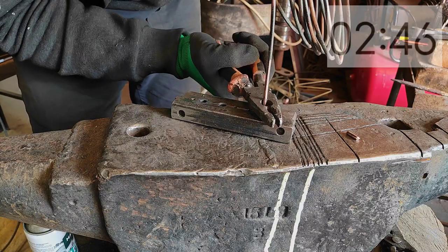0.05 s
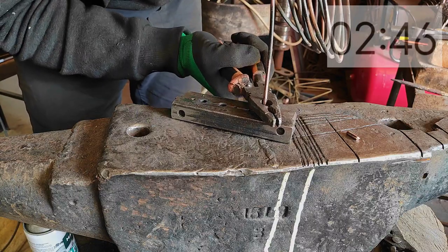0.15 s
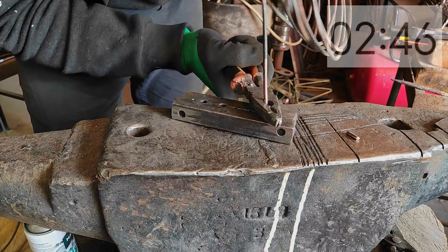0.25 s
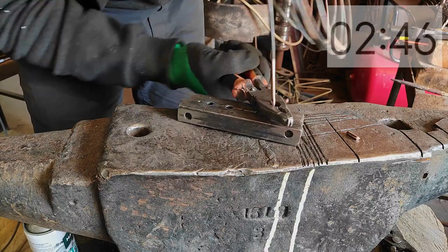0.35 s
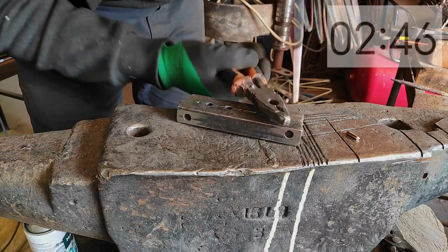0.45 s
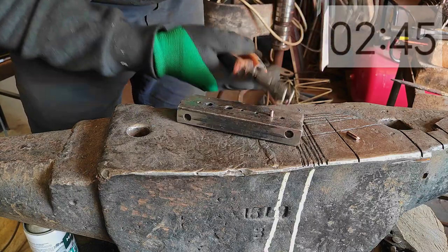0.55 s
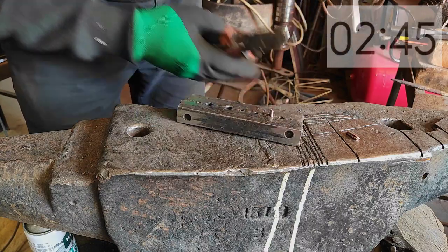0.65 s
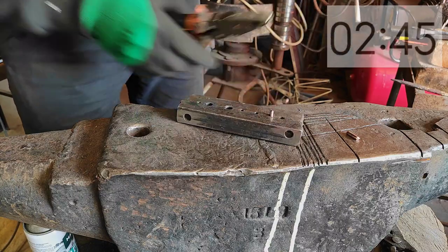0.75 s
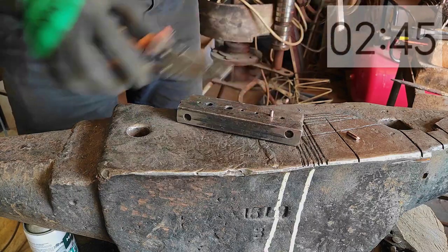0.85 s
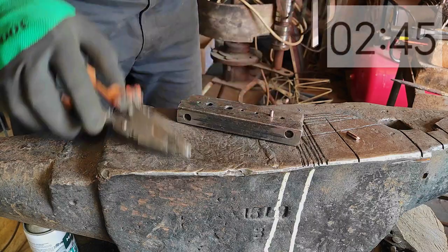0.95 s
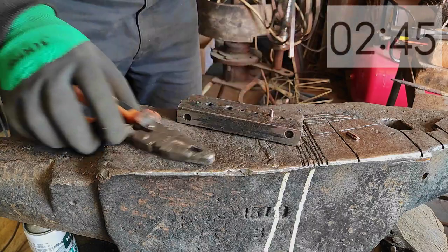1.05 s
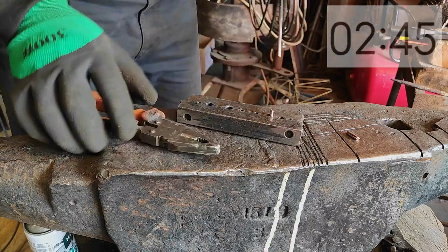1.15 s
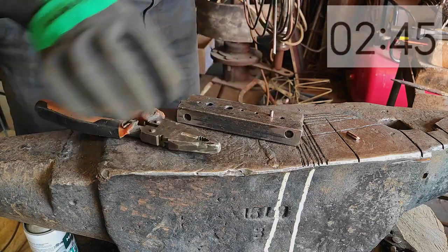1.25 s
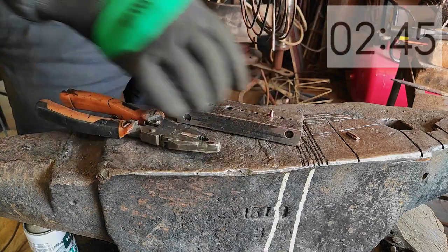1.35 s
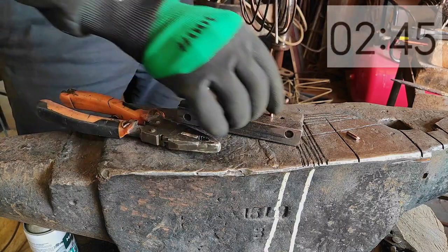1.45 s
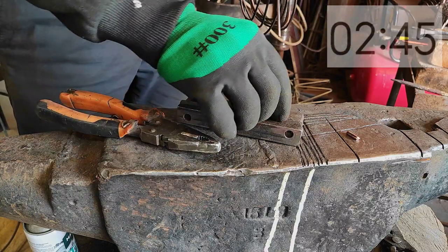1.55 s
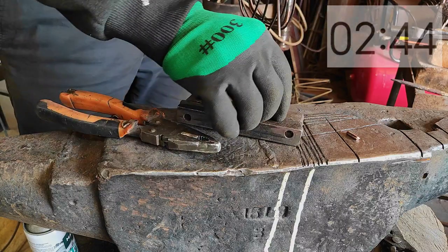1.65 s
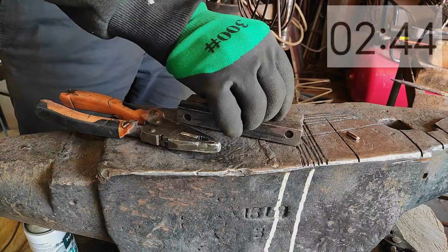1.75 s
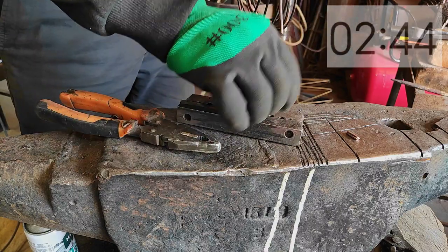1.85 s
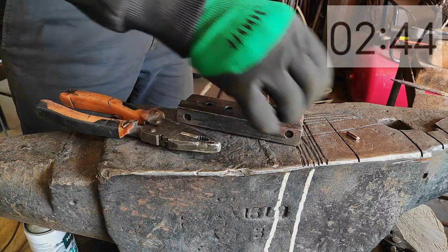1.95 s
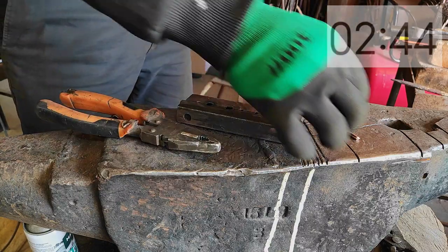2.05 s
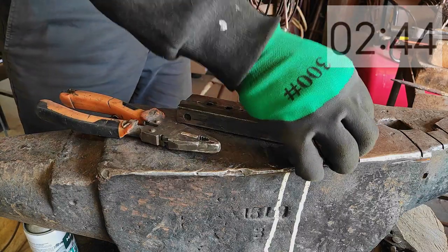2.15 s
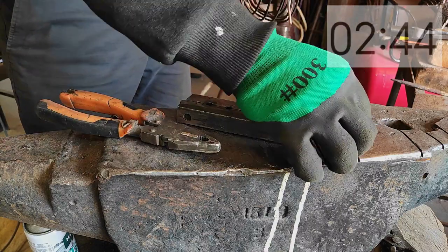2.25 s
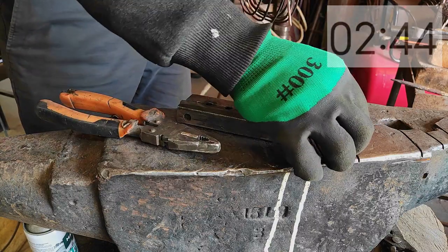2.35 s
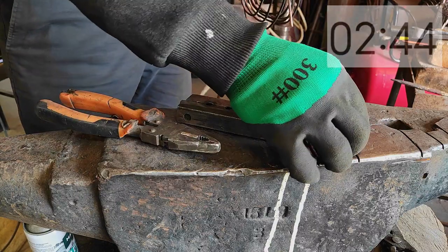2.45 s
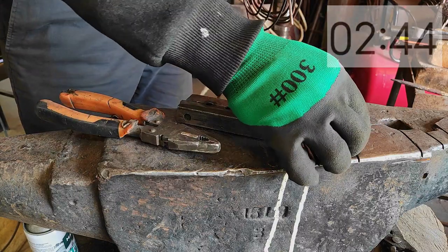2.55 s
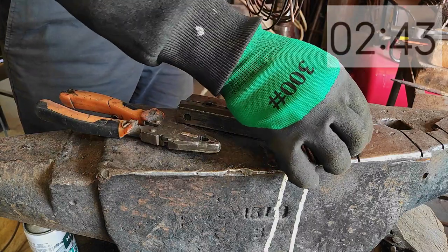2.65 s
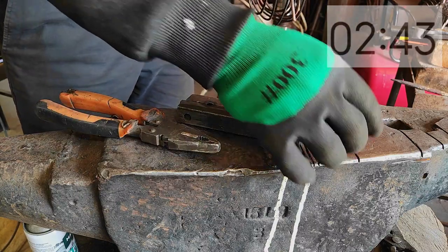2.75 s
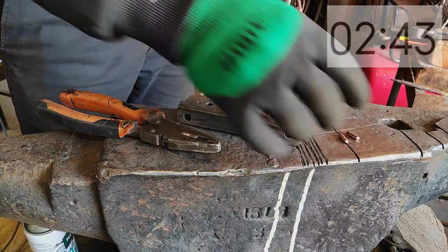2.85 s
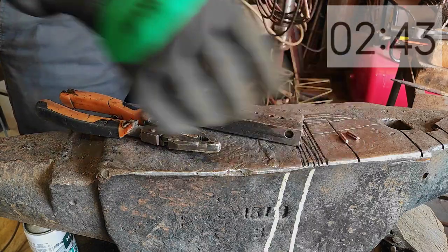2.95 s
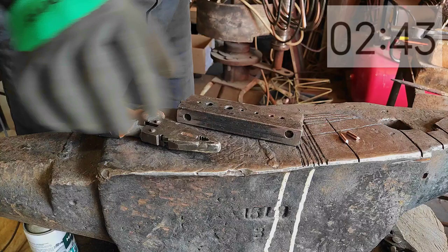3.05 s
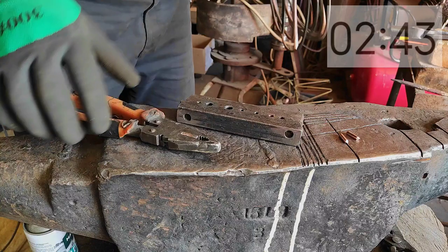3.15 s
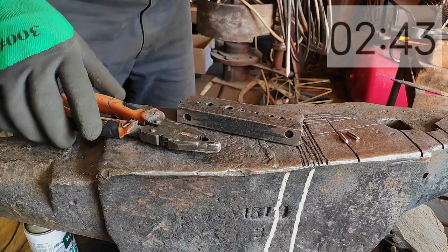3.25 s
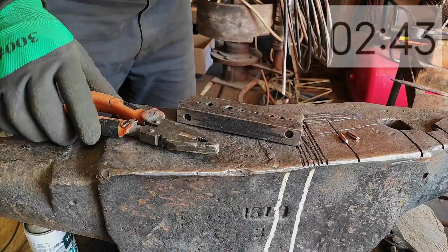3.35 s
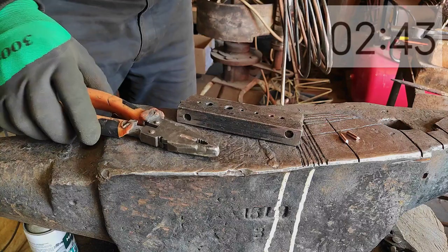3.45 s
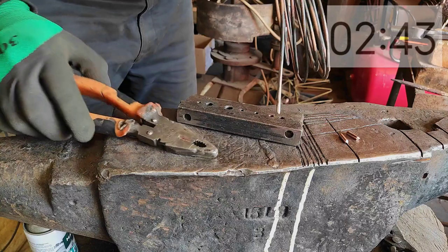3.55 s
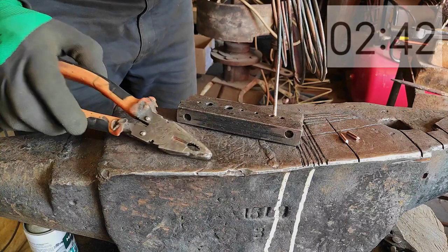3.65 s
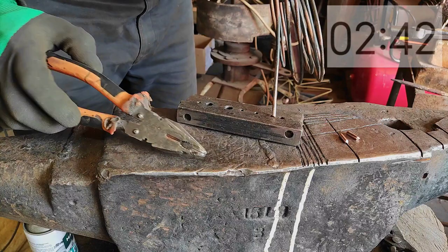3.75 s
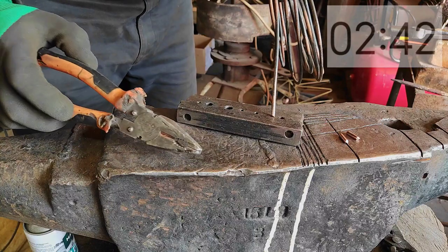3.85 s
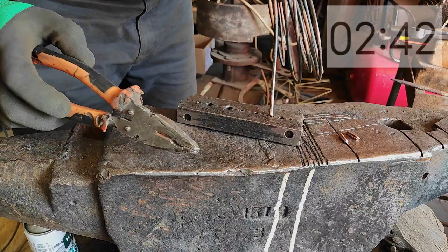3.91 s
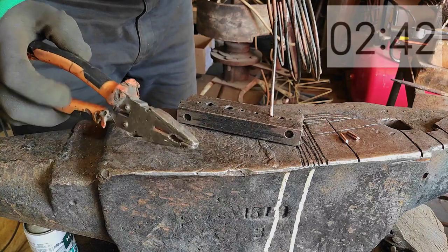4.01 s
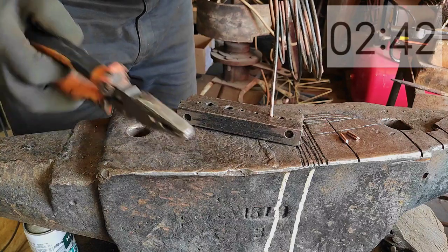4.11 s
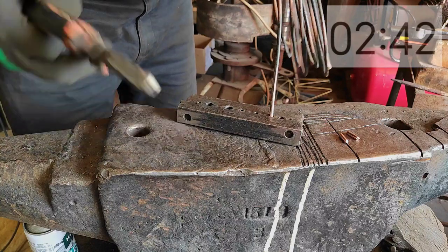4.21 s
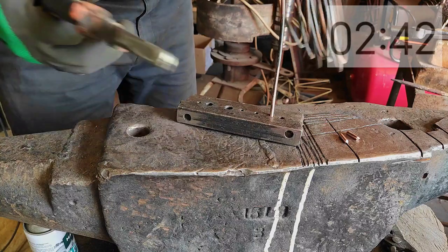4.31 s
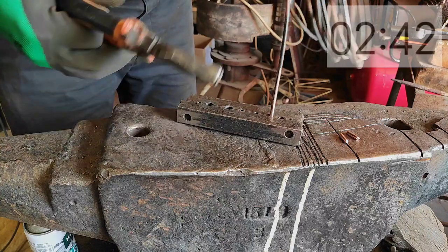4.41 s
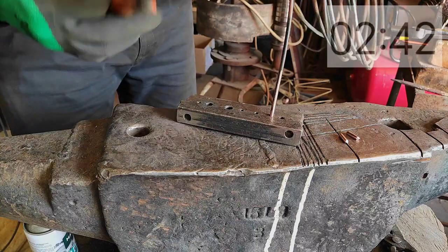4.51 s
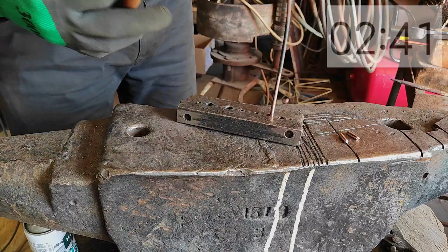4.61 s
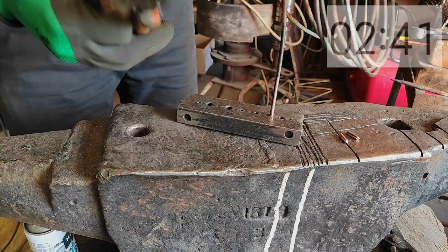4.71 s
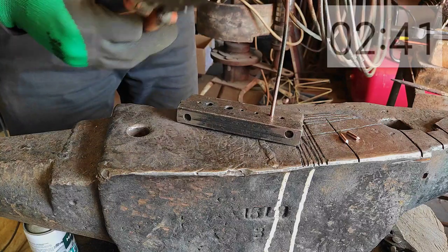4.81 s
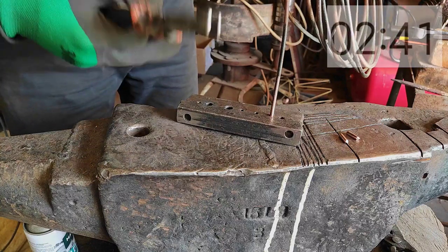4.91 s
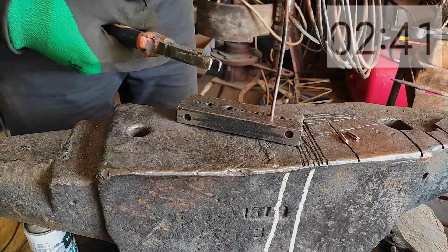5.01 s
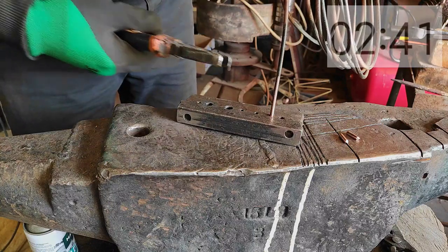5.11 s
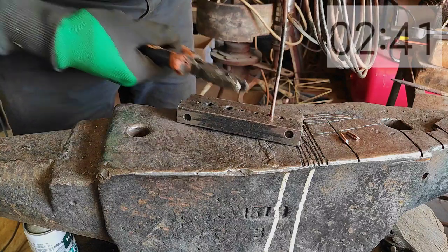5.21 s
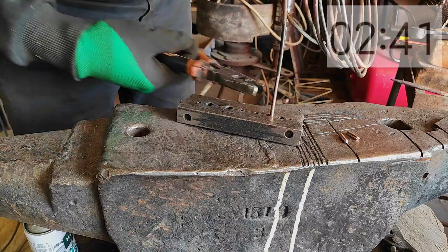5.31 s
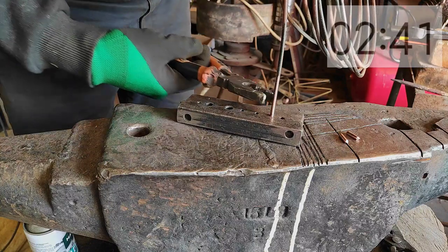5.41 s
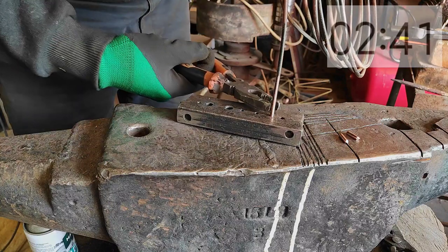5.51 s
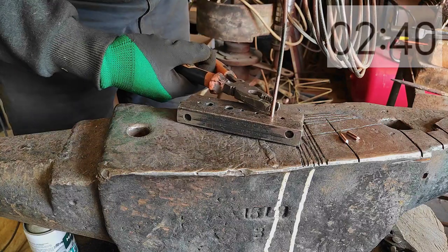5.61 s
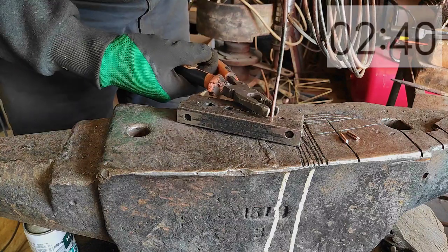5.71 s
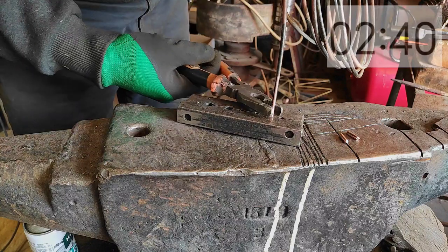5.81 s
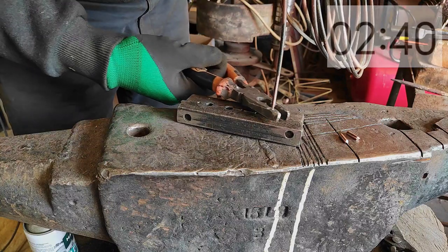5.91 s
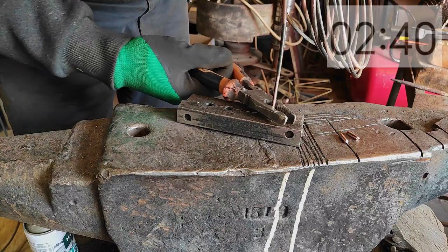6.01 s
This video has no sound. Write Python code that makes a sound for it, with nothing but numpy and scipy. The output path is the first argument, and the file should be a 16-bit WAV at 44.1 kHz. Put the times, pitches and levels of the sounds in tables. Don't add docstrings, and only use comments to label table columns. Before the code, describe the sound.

Close stereo view of a bench in a small, hard-walled workshop. Nippers cut a copper rod with a loud sharp crack and brief rattle; tiny offcuts tick. The tool clanks down on an anvil with a ring, gloves rustle quietly, then it is picked up with a bright clack. Its joint clicks, and it returns with a hard tap and small knocks. A faint distant engine hums beneath soft hiss.

```python
import sys
import numpy as np
from scipy import signal
from scipy.fft import rfft, irfft
from scipy.io import wavfile
from scipy.ndimage import uniform_filter1d

SR = 44100
rng = np.random.default_rng(int(sys.argv[2]) if len(sys.argv) > 2 else 0)


def voltage_ratio(level):
    return 10 ** (np.asarray(level, float) / 20)


def waveform_to_disk(signal):
    frames = np.transpose(np.atleast_2d(signal))
    scaled = np.clip(frames, -1, 1) * 32767
    samples = np.round(scaled).astype(np.int16)
    wavfile.write(sys.argv[1], SR, samples)


N = 267610

# pitch_hz, level_db
AIR_COLOUR = [(90, -25), (150, -14), (183, -0.5), (250, -9.5), (310, -7.5), (1000, -15), (1700, -16.5),
              (3500, -21.5), (6500, -25), (8600, -30), (10300, -29), (15200, -26), (15900, -44),
              (17000, -63.5)]
# time_s, speed_turns_per_s
ENGINE_SPEED = [(0.18, 19.3), (0.69, 20.9), (0.98, 23.3), (1.28, 24.3), (1.74, 23.3), (2.04, 20.6),
                (2.33, 23.3), (2.7, 22.1), (2.96, 22.2), (3.57, 24.4), (3.92, 22.4), (4.22, 23.4),
                (4.34, 21.7), (4.73, 24.4), (5.53, 21.2), (5.8, 24.0), (6.07, 22.5)]
# multiple_of_turn_rate, level_db
ENGINE_ORDERS = [(2, -69), (4, -65), (5, -63), (6, -69)]
# pitch_hz, width_hz, level_db
HUM_BODY = [(73.2, 12, -2), (101.6, 37, -2), (177.6, 32, -7)]
# start_s, end_s, pitch_hz, level_db
DRONE = [
    (0.058, 0.273, 371, -65.5),
    (0.725, 1.06, 371, -64),
]
# pitch_hz, t60_s, level_db
ROOM_DECAY = [(162.4, 0.91, -5.5), (293.5, 0.71, -6), (502, 0.61, -7.5), (905, 0.56, -7.5),
              (2020, 0.51, -8), (3744, 0.35, -10), (7900, 0.31, -9), (13400, 0.29, -13)]

# start_s, length_s, level_db, dull_rub_weight_db
GLOVE_STROKES = [(0.0, 0.053, -79.5, 14.5), (0.757, 0.0425, -69, 1.5), (0.835, 0.05, -64.5, -5),
                 (0.905, 0.094, -64.5, -2), (1.268, 0.034, -59.5, -18), (1.677, 0.056, -69.5, 2),
                 (1.807, 0.019, -68.5, -4), (1.893, 0.034, -66.5, -1.5), (2.103, 0.027, -66, -19),
                 (2.14, 0.032, -59.5, -4), (2.235, 0.035, -71.5, -8), (2.784, 0.039, -65, -3),
                 (3.29, 0.2, -71.5, -5), (3.391, 0.023, -80, -15), (4.554, .04, -69.5, -13),
                 (3.533, 0.052, -66.5, -10), (4.152, 0.054, -64, -19), (4.292, 0.16, -58.5, -26.5),
                 (4.635, 0.044, -60, -12), (4.724, 0.064, -54.5, -19), (4.853, 0.016, -65, -25),
                 (4.955, 0.086, -64.5, -23), (5.208, 0.24, -74.5, 5), (5.87, 0.0267, -86, -3.5),
                 (5.985, 0.053, -74, 12)]
# start_s, length_s, pitch_hz, level_db
SQUEAK_STROKES = [(0.062, 0.096, 1170, -72), (0.47, .025, 6500, -53), (.555, .02, 2790, -56.5),
                  (1.807, .02, 2900, -69), (1.923, .03, 750, -64.5), (3.277, .04, 3600, -73.5),
                  (3.308, .015, 2960, -73), (3.375, 0.014, 6500, -76), (3.705, .015, 2700, -59),
                  (4.887, .008, 1500, -61), (5.21, .04, 2900, -73.5), (5.297, 0.11, 3530, -74),
                  (5.323, 0.055, 1780, -70.5), (5.377, 0.043, 2150, -74), (5.968, 0.034, 6140, -68)]

# pitch_hz, width_octaves, level_db
SHIVER_MODES = [(1580, 0.32, -1.5), (2700, 0.36, -7.5), (3900, 0.19, -2.5), (5400, .12, -3.5),
                (6500, .5, -2.5)]
# start_s, level_db
SHIVER_STARTS = [
    (.311, -34.5),
    (0.393, -44),
    (1.112, -46),
]

# start_s, peak_db
BLOCK_THUMPS = [(0.308, -22.5), (0.392, -32), (1.95, -51.5), (5.506, -47), (5.836, -45.5), (6.007, -43.5),
                (6.048, -45)]
# start_s, peak_db
ANVIL_THUMPS = [(1.106, -28), (1.14, -34.5), (1.199, -28.5), (3.612, -39.5), (4.631, -50), (4.727, -45.5),
                (5.621, -34)]
# start_s, peak_db, pitch_hz
STAND_THUMPS = [(0.305, -33.5, 158), (0.4, -35, 107), (1.111, -36.5, 171), (1.205, -33.5, 161),
                (1.268, -48, 174), (3.614, -53, 107), (5.624, -48, 114)]

# start_s, peak_db, left_minus_right_db, bass_db, treble_db
JOINT_CLICKS = [(1.952, -49, -4, -8, -16), (1.9649, -47.5, -3, -12.5, -22), (3.2687, -59.5, -2, -13, -24),
                (3.5311, -57, -2.5, -22.5, -23), (3.5475, -52, -4, -22, -19), (3.5785, -50, -5, -11, -24),
                (4.2825, -44.5, -3, -11, -12), (4.6324, -46.5, -4, -15, -27), (4.7098, -41, -1, -11, -36),
                (4.7300, -30.5, -5, -19, -24), (4.8846, -52, -2, -13, -7), (4.8994, -54, -6, -24, -15)]
# pitch_hz, level_db
JOINT_COLOUR = [(290, -19.5), (500, -14), (2730, -6.5), (3700, -3), (5310, -15.5), (6060, -4), (7100, -21),
                (14900, -21), (16000, -40)]
# pitch_hz, level_db, t60_s, left_minus_right_db, left_lead_rad, rise_s
PIVOT_MODES = [(5800, 3, 0.045, 20, 0.62, 0.00088), (6230, 1.1, 0.085, -5, 0.67, 0.00075)]
# start_s, level_db
PIVOT_STARTS = [(1.955, -60), (1.965, -55.5), (4.283, -60), (4.712, -71), (4.731, -47), (6.013, -61),
                (6.052, -52)]
# pitch_hz, level_db, t60_s, left_minus_right_db, left_lead_rad, rise_s
SPRING_MODES = [(4730, -1, .03, 6, .6, 0.0011), (5900, 6, 0.025, 18, 0.66, 0.00081),
                (7640, 3, 0.029, -11, .5, 0.00082), (12730, -8, 0.043, -13, .5, .001)]
# start_s, level_db
SPRING_STARTS = [(4.515, -67), (4.879, -62), (4.8865, -52), (4.9, -56), (4.915, -63), (4.931, -59),
                 (4.938, -64), (4.947, -62)]

# start_s, peak_db, left_minus_right_db, bass_db, treble_db
OFFCUT_TICKS = [(0.4733, -38, 1.3, -36, -16), (0.5144, -22.5, 1.0, -16.5, -21.5),
                (0.5337, -29, 0.81, -15, -16), (0.7206, -44.5, -1.2, -3.5, -18),
                (2.576, -54, 0.5, -21.5, -15), (5.5056, -27.5, -1.6, -16.5, -18),
                (5.5105, -30, -0.13, -17.5, -16.5)]
# pitch_hz, level_db
OFFCUT_COLOUR = [(350, -23.5), (600, -7), (1040, -11.5), (1230, -7), (3210, -3.5), (5630, 3), (7830, -2.5),
                 (13400, -4.5), (16000, -10.5)]

# start_s, peak_db, left_minus_right_db, bass_db, treble_db
BLOCK_KNOCKS = [(0.876, -45.5, -0.5, -2, -28), (1.233, -44.5, 0.91, -4, -32), (3.563, -51, -1.5, -10, -30),
                (3.584, -53, 0, -5, -30), (4.886, -56, 0.48, -14, -32), (5.8294, -26, -1.5, -7, -19),
                (5.845, -35, -0.5, -20, -25), (6.013, -38, -1.6, 0, -28), (6.0395, -40.5, -1.4, 3, -27),
                (6.051, -36, -0.5, 1, -12)]
# pitch_hz, level_db
BLOCK_COLOUR = [(290, -38.5), (500, -14.5), (946, -5), (2190, -10.5), (3590, -6), (6230, -13),
                (7860, -12.5), (8580, -23.5), (9770, -17.5), (14700, -20.5), (16000, -30)]
# pitch_hz, level_db, t60_s, left_minus_right_db, left_lead_rad, rise_s
BLOCK_MODES = [(959, 0.96, 0.035, 0, .2, .001), (1436, 0, 0.025, 0, .5, .001)]
# start_s, level_db
BLOCK_STARTS = [(.876, -48), (5.785, -53), (5.799, -56), (5.83, -38.5), (5.846, -41), (6.013, -40.5),
                (6.039, -52), (6.052, -39)]

# start_s, peak_db, left_minus_right_db, bass_db, treble_db
JAW_BLOWS = [(5.6192, -16, 0, -31, -32), (5.6324, -34, 0.18, -27, -45), (5.6262, -32, 1, -38, -38),
             (5.771, -35.5, 0.9, -33, -48)]
# pitch_hz, level_db
JAW_COLOUR = [(290, -21), (500, -31), (974, -10), (1740, -17.5), (2130, -7), (2330, -11), (2690, -5.5),
              (6420, -3.5), (8700, -10), (14700, -14.5), (16000, -32)]
# pitch_hz, level_db, t60_s, left_minus_right_db, left_lead_rad, rise_s
JAW_TIP_MODES = [(4720, -6, .1, 0, .8, .001), (3600, 5, .03, 0, .5, .001), (2750, 2, .03, 0, .5, .001)]
# start_s, level_db
JAW_TIP_STARTS = [(5.62, -52), (5.771, -55), (5.785, -57), (5.846, -56)]
# pitch_hz, level_db, t60_s, left_minus_right_db, left_lead_rad, rise_s
JAW_RING_MODES = [(2190, -1.5, .7, -4, .9, .04), (1981, -6, .25, -8, -1, .005),
                  (2794, -3, .15, 0, .5, .002), (6212, 8, .09, 0, .5, .001), (7634, -1, .14, 2, .6, .002),
                  (5249, -6, .4, 0, .5, .002), (3580, -1, .2, 0, .5, .002), (4592, -5, .25, 2, .4, .002),
                  (7499, 0, .17, 0, .6, .002)]
# start_s, level_db
JAW_RING_STARTS = [
    (5.62, -52),
]

# start_s, peak_db, left_minus_right_db, bass_db, treble_db
LIFT_BLOWS = [
    (3.6101, -19.5, 0.12, -50, -25),
    (3.6254, -46, 1.5, -39.5, -19),
]
# pitch_hz, level_db
LIFT_COLOUR = [(290, -45), (500, -20), (718, -22), (880, -14), (1900, -17.5), (3650, -4.5), (4030, -9),
               (5880, -0.5), (8090, -21), (9360, -11), (15100, -29.5), (16000, -54.5)]
# pitch_hz, level_db, t60_s, left_minus_right_db, left_lead_rad, rise_s
HANDLE_MODES = [(3661, -1, .17, -3, .5, .002), (3585, -1, .17, 0, .5, .002), (4500, -21, 1.1, 2, .2, .002),
                (5658, -15, .55, -6, -1.5, .002), (5534, -11, .35, 2, .5, .002),
                (6476, -6, .15, 0, .7, .002), (4700, -13, .25, -2, .5, .002), (6185, -10, .24, 0, .5, .002),
                (8446, -16, .19, 3, .3, .002)]
# start_s, level_db
HANDLE_STARTS = [
    (3.6128, -40.5),
]
# pitch_hz, level_db, t60_s, left_minus_right_db, left_lead_rad, rise_s
LIFT_CLANK_MODES = [(3590, -4, 0.015, -1, 0.75, 0.00035), (5880, 4, 0.014, 0, 0.9, 0.001),
                    (5560, -1, .012, 1, .9, .001)]
# start_s, level_db
LIFT_CLANK_STARTS = [(3.6103, -16), (3.6168, -36), (3.6188, -35), (3.6275, -38), (3.64, -39)]

# start_s, peak_db, left_minus_right_db, bass_db, treble_db
LAID_BLOWS = [(1.1052, -10, -1.5, -17, -24), (1.1177, -25.5, 2.5, -21, -25.5),
              (1.1400, -21, 0.5, -15, -29.5), (1.128, -33, 0.5, -23, -28), (1.153, -33, 3, -27, -26),
              (1.166, -34, -1.5, -22, -28.5), (1.1862, -30.5, 3, -20, -32.5), (1.188, -37, 0.5, -16, -27.5),
              (1.2252, -38.5, 6.5, -7, -30)]
# pitch_hz, level_db
LAID_COLOUR = [(290, -48.5), (500, -24), (1060, -14.5), (1210, -13.5), (1840, -28), (2430, -12.5),
               (3390, -11.5), (4340, -7), (4800, -5), (5240, -1), (8960, -22.5), (10800, -17.5),
               (16000, -32.5)]
# pitch_hz, level_db, t60_s, left_minus_right_db, left_lead_rad, rise_s
ANVIL_MODES = [(4502, 2, .7, 2, .1, .002), (5055, -9.5, 1.3, -1, .7, .14), (5658, -14, .45, -5, -2.7, .002),
               (8446, -13, .26, 3, .3, .002), (2896, -7, .2, 2, .6, .004), (3854, -9, .25, -3, .8, .004),
               (6368, -12, .24, 2, -.5, .004), (5350, -9, .14, -3, .9, .003), (10130, -19, .17, 3, 1, .003),
               (10920, -18, .16, -3, -1, .003)]
# start_s, level_db
ANVIL_STARTS = [
    (1.105, -37),
]
# pitch_hz, level_db, t60_s, left_minus_right_db, left_lead_rad, rise_s
JAW_CLANK_MODES = [(2900, -14, .016, 1.44, .5, .0005), (4190, -7, 0.019, 0, .6, .0004),
                   (5270, 0, 0.013, -1.5, 0.93, .0004), (6140, 2, .012, 0, 0.7, 0.0003)]
# start_s, level_db
JAW_CLANK_STARTS = [(1.105, -19.5), (1.1064, -16), (1.1079, -29.5), (1.118, -30), (1.1325, -34)]
# pitch_hz, level_db, t60_s, left_minus_right_db, left_lead_rad, rise_s
BOUNCE_MODES = [(1200, -11, .02, 1, .5, .0006), (2700, -5, .022, -2, .7, .0006),
                (3750, 0, .022, -2, .6, .001)]
# start_s, level_db
BOUNCE_STARTS = [(1.1405, -22.5), (1.1845, -36), (1.193, -40), (1.2025, -41)]

# start_s, peak_db, left_minus_right_db, bass_db, treble_db
SNIP_BLOWS = [(0.3086, -7, 0, -14, -18.5), (0.3136, -16, -2.5, -29, -19), (0.3155, -20.5, 4, -31.5, -23),
              (0.3219, -14.5, 3, -29.5, -18.5), (0.3268, -20.5, -1, -24.5, -22.5),
              (0.338, -25, -2, -25.5, -24.5), (0.391, -33, 2.5, -13.5, -20.5)]
# pitch_hz, level_db
SNIP_COLOUR = [(290, -32.5), (500, -11.5), (1090, -12.5), (1460, 2.5), (1870, -12), (2190, -4.5),
               (2650, -8.5), (4030, -3.5), (5880, -5.5), (9360, -13.5), (11300, -10), (14900, -16.5),
               (16000, -30)]
# pitch_hz, level_db, t60_s, left_minus_right_db, left_lead_rad, rise_s
ROD_MODES = [(1969, 0, .5, -14, -2.2, .01), (2187, -1, .5, -7, .9, .01), (5060, -17, 1.3, 0, .5, .01),
             (1497, -2, .3, 2, .8, .005), (3682, -7, .35, -3, 1, .005), (5238, -3, .22, 3, .6, .004),
             (5432, -3, .4, -3, 1, .005), (2676, 2, .15, 0, .5, .003), (7251, -9, .35, -4, .8, .004)]
# start_s, level_db
ROD_STARTS = [
    (.31, -42),
    (.3913, -41.5),
    (4.73, -66),
]
# pitch_hz, level_db, t60_s, left_minus_right_db, left_lead_rad, rise_s
CUT_CLANK_MODES = [(549, -15.5, 0.032, 0, .3, 0.00084), (1275, -3, 0.014, 2, .7, 0.00039),
                   (1560, -1, .01, -1, .8, .0004), (3680, -2.5, .011, 5.5, 1.2, 0.00037)]
# start_s, level_db
CUT_CLANK_STARTS = [
    (.3088, -9),
]
# pitch_hz, level_db, t60_s, left_minus_right_db, left_lead_rad, rise_s
REBOUND_MODES = [(4040, 0, 0.014, 7, .9, .0008), (5300, -6, 0.022, 5.5, .5, 0.00089),
                 (7270, -4, 0.039, -9.5, .8, .0005)]
# start_s, level_db
REBOUND_STARTS = [(.3136, -18.5), (.3175, -27.5), (.3221, -24.5), (.337, -32.5)]


def resonances(hz, body):
    hz = np.maximum(hz, 1)
    total = 0
    for k, (centre_hz, width_hz, db) in enumerate(body):
        detune = (hz / centre_hz - centre_hz / hz) * centre_hz / width_hz
        total = total + (-1) ** k * voltage_ratio(db) / (1 + 1j * detune)
    return total


def coloured(x, gain):
    length = x.shape[-1]
    y = irfft(rfft(x) * gain(np.fft.rfftfreq(length, 1 / SR)), length)
    return y / np.sqrt(np.mean(y ** 2))


def band(hz, octaves):
    return lambda f: np.exp(-.5 * (np.log2(np.maximum(f, 1) / hz) / octaves) ** 2)


def causal(db):
    cepstrum = irfft(db * np.log(10) / 20)
    half = len(cepstrum) // 2
    cepstrum[1:half] *= 2
    cepstrum[half + 1:] = 0
    return np.exp(rfft(cepstrum))


def pair(like):
    mid, side = rng.standard_normal((2, N))
    like = np.clip(like, 0, 1)
    return np.sqrt(1 + like) * mid + np.sqrt(1 - like) * side * np.array([[1], [-1]])


def walk(rate):
    hold = int(SR / rate)
    steps = np.repeat(rng.standard_normal(N // hold + 1), hold)
    return 1.29 * uniform_filter1d(uniform_filter1d(steps, hold), hold)[:N]


def add(out, s, x):
    i = int(s * SR)
    out[:, i:i + x.shape[1]] += x[:, :N - i]


def air():
    hz, db = np.transpose(AIR_COLOUR)

    def mid_side_gain(f):
        alike = np.clip(1.2 - f / 450, 0, 1)
        return voltage_ratio(np.interp(np.log(f + 1), np.log(hz), db)) * np.sqrt([1 + alike, 1 - alike])

    mid, side = coloured(rng.standard_normal((2, N)), mid_side_gain)
    return voltage_ratio(-62.5 + .5 * walk(3.32)) * np.array([mid + side, mid - side]) / np.sqrt(2)


def far_engine():
    t = np.arange(N) / SR
    s, turns_hz = np.transpose(ENGINE_SPEED)
    speed = uniform_filter1d(np.interp(t, s, turns_hz), SR // 10) * (1 + .006 * walk(15))
    turn = 2 * np.pi * np.cumsum(speed) / SR
    lag_rad = 0.32 * np.array([[1], [-1]])
    orders = 0
    for k, db in ENGINE_ORDERS:
        orders = orders + voltage_ratio(db + 3.0 * walk(4.0)) * np.sin(k * turn + k * k + lag_rad)
    out = np.sqrt(2) * orders * voltage_ratio(7 * np.exp(-t / 1.1))
    hum_level = voltage_ratio(-64 + 2.2 * walk(2.3))
    out += hum_level * coloured(pair(1.0), lambda f: resonances(f, HUM_BODY) ** 2)
    rumble_level = voltage_ratio(-57 + 1.8 * walk(4))
    out += rumble_level * coloured(pair(0.4), lambda f: band(36, .55)(f) + voltage_ratio(5) * band(11, .6)(f))
    for start, end, hz, db in DRONE:
        swell = np.sin(np.pi * np.clip((t - start) / (end - start), 0, 1))
        out += voltage_ratio(db + 1.2 * walk(17.5)) * swell * np.sin(2 * np.pi * hz * t)
    return out


def room(x, gap_s=0.002, early_db=4, early_s=0.024):
    t, echoes = np.arange(SR) / SR, 0
    for hz, t60, db in ROOM_DECAY:
        noise = coloured(pair(250 / hz)[:, :SR], band(hz, 0.42)) * np.sqrt(hz / 8000)
        echoes = echoes + noise * voltage_ratio(db - 60 * t / t60 + 2.5 * walk(250)[:SR])
    echoes = echoes * np.clip((t - gap_s) / 0.0026, 0, 1) * voltage_ratio(early_db * np.exp(-t / early_s) - 35.0)
    sent = x.sum(axis=0, keepdims=True) * np.ones((2, 1)) / 2 + .5 * x
    return signal.fftconvolve(sent, echoes, axes=1)[:, :N]


def rustle():
    attack_s, release_s = 0.02, 0.039
    grains = voltage_ratio(2.1 * np.minimum(rng.exponential(size=N), 6)) * voltage_ratio(2.8 * walk(40))
    fibres = coloured(pair(0.035) * grains, band(3840, 0.92))
    fizz = coloured(pair(0.035) * grains, band(12620, 0.43))
    dull = coloured(pair(0.035) * grains, band(839, 1.0))
    slip, rub, t = 0, 0, np.arange(N) / SR
    for s, length_s, db, rub_db in GLOVE_STROKES:
        rise = np.minimum((t - s) / attack_s, 0)
        fall = np.maximum(t - s - length_s, 0) / release_s
        shape = np.exp(rise - fall)
        slip = slip + voltage_ratio(db) * shape
        rub = rub + voltage_ratio(db + rub_db) * shape
    return slip * (fibres + voltage_ratio(-8.5) * fizz) + rub * dull


def squeaks():
    out, edge_s = np.zeros((2, N)), .008
    for s, length_s, hz, db in SQUEAK_STROKES:
        t = np.arange(int((length_s + 6 * edge_s) * SR)) / SR
        shape = np.clip(t / edge_s, 0, 1) * np.exp(-np.maximum(t - length_s, 0) / edge_s)
        slips = rng.standard_normal((3, len(t))) * voltage_ratio(3.4 * rng.exponential(size=len(t)))
        tone = coloured(slips[0] + slips[1:], band(hz, .05))
        add(out, s - edge_s / 2, voltage_ratio(db) * shape * tone)
    return out


def shiver():
    t, rattle = np.arange(N) / SR, voltage_ratio(3.0 * walk(300))
    fade, steel = 0, 0
    for s, db in SHIVER_STARTS:
        fade = fade + voltage_ratio(db - 60 * np.maximum(t - s, 0) / .35) * np.clip((t - s) / 0.0026, 0, 1)
    for hz, octaves, db in SHIVER_MODES:
        steel = steel + voltage_ratio(db) * coloured(pair(0.14) * rattle, band(hz, octaves))
    return fade * steel


def thumps():
    handle_t60_s, stand_t60_s = 0.036, 0.09
    out, t = np.zeros((2, N)), np.arange(SR // 4) / SR
    rows = [(s, db, 343.5, handle_t60_s) for s, db in BLOCK_THUMPS]
    rows += [(s, db, 292.3, handle_t60_s) for s, db in ANVIL_THUMPS]
    rows += [(s, db, hz, stand_t60_s) for s, db, hz in STAND_THUMPS]
    for s, db, hz, t60 in rows:
        swing = (1 - np.exp(-t / 0.00065)) ** 2 * np.cos(2 * np.pi * hz * t)
        add(out, s, voltage_ratio(db - 60 * t / t60) * swing * np.ones((2, 1)))
    return np.array([out, voltage_ratio(-2.5) * out])


def rings(starts, modes):
    out, port = np.zeros((2, N)), np.array([[.5], [-.5]])
    for s, db in starts:
        for hz, mode_db, t60, pan_db, lead, rise_s in modes:
            t = np.arange(int(t60 * SR)) / SR
            fade = (1 - np.exp(-t / rise_s)) * voltage_ratio(db + mode_db + port * pan_db - 60 * t / t60)
            add(out, s, fade * np.sin(2 * np.pi * hz * t + port * lead))
    return out * voltage_ratio(1.1 * walk(30))


def joint_pings():
    return rings(PIVOT_STARTS, PIVOT_MODES) + rings(SPRING_STARTS, SPRING_MODES)


def gripped_clanks():
    clank = rings(JAW_CLANK_STARTS, JAW_CLANK_MODES)
    clank += rings(CUT_CLANK_STARTS, CUT_CLANK_MODES)
    return clank + rings(REBOUND_STARTS, REBOUND_MODES)


def bench_clanks():
    clank = rings(LIFT_CLANK_STARTS, LIFT_CLANK_MODES)
    clank += rings(BLOCK_STARTS, BLOCK_MODES)
    return clank + rings(BOUNCE_STARTS, BOUNCE_MODES)


def long_rings():
    ringing = rings(ROD_STARTS, ROD_MODES)
    ringing += rings(ANVIL_STARTS, ANVIL_MODES)
    ringing += rings(HANDLE_STARTS, HANDLE_MODES)
    ringing += rings(JAW_TIP_STARTS, JAW_TIP_MODES)
    return ringing + rings(JAW_RING_STARTS, JAW_RING_MODES)


def chatter(t, chatter_s):
    burst = rfft(rng.standard_normal((3, len(t))) * t / chatter_s * np.exp(-t / chatter_s))
    evened = irfft(burst / np.abs(burst) ** 1.56)
    return rfft(evened * np.exp(-t / (3 * chatter_s)))


def blows(events, body, chatter_s, wet_db):
    out, walls, t = np.zeros((2, N)), np.zeros((2, N)), np.arange(1024) / SR
    hz = np.fft.rfftfreq(len(t), 1 / SR) + 1
    body_hz, body_level = np.transpose(body)
    body_db = np.interp(np.log(hz), np.log(body_hz), body_level)
    alike = 1 / (1 + (hz / 1800) ** 2)
    main = max(events, key=lambda row: row[1])
    for s, db, pan_db, bass_db, treble_db in events:
        tilt = [0.74 * (bass_db - main[3]), 0, 0, treble_db - main[4]]
        tilt_db = np.interp(np.log(hz), np.log([1600, 2550, 6944, 8500]), tilt)
        colour = causal(body_db + tilt_db)
        shared, *own = chatter(t, chatter_s)
        crack = irfft(colour * (alike * shared + (1 - alike) * np.array(own)))
        peak = np.abs(crack).max(axis=1, keepdims=True)
        crack *= voltage_ratio(db + np.array([[pan_db], [-pan_db]]) / 2) * np.sqrt(2) / peak
        add(out, s, crack)
        even = irfft(colour)
        energy_ratio = np.sum(crack ** 2, axis=1, keepdims=True) / np.sum(even ** 2)
        add(walls, s, voltage_ratio(wet_db) * even * np.sqrt(energy_ratio))
    return np.array([out, walls])


def tool_blows():
    hits = blows(SNIP_BLOWS, SNIP_COLOUR, chatter_s=0.00052, wet_db=-2.0)
    hits += blows(OFFCUT_TICKS, OFFCUT_COLOUR, chatter_s=0.0023, wet_db=0.0)
    hits += blows(LAID_BLOWS, LAID_COLOUR, chatter_s=0.00032, wet_db=0.5)
    hits += blows(LIFT_BLOWS, LIFT_COLOUR, chatter_s=0.0012, wet_db=-2.0)
    hits += blows(JOINT_CLICKS, JOINT_COLOUR, chatter_s=0.0013, wet_db=-4.5)
    hits += blows(JAW_BLOWS, JAW_COLOUR, chatter_s=0.0007, wet_db=-3.5)
    hits += blows(BLOCK_KNOCKS, BLOCK_COLOUR, chatter_s=0.0008, wet_db=-1.5)
    return hits


def scene():
    direct, walls = tool_blows() + thumps()
    ringing = long_rings()
    steel = joint_pings() + shiver() + gripped_clanks()
    ringing += bench_clanks()
    echoes = room(walls + voltage_ratio(-8) * steel)
    return direct + ringing + steel + echoes + rustle() + squeaks() + far_engine() + air()


def band_limit(x):
    return signal.sosfilt(signal.butter(12, 16800, fs=SR, output="sos"), x)


def record(dry):
    ported = dry - 0.38 * signal.lfilter(*signal.iirpeak(8600, 5., fs=SR), dry)
    top_cut = signal.butter(8, 16000, fs=SR, output="sos")
    mix = signal.sosfilt(top_cut, ported)
    return band_limit(mix)


dry = scene()
out = record(dry)
waveform_to_disk(out)
```